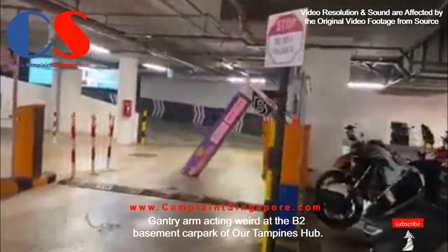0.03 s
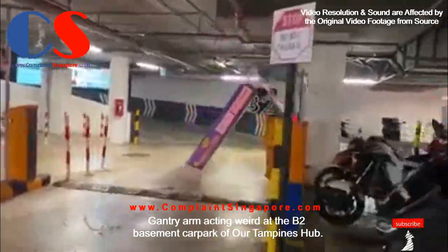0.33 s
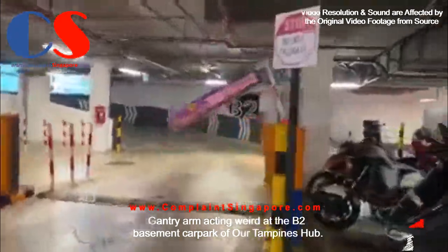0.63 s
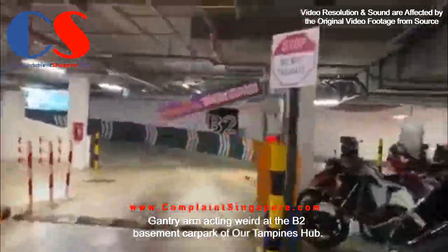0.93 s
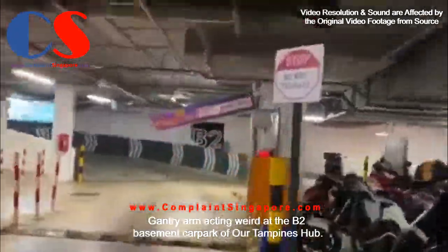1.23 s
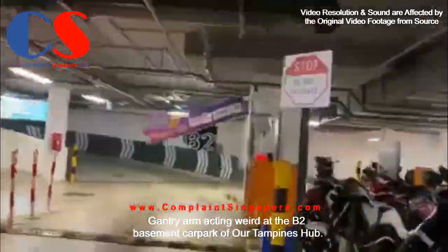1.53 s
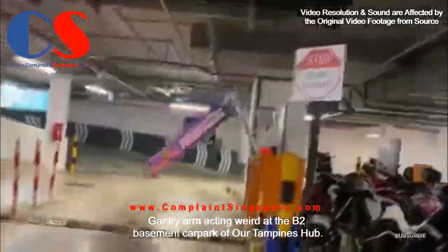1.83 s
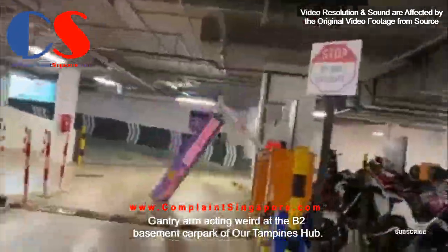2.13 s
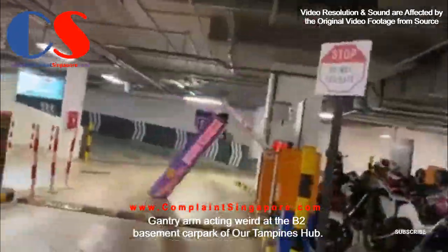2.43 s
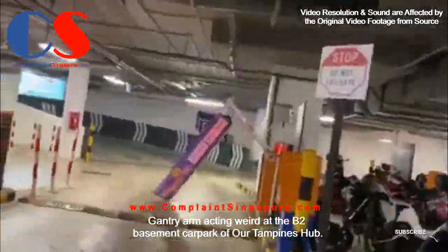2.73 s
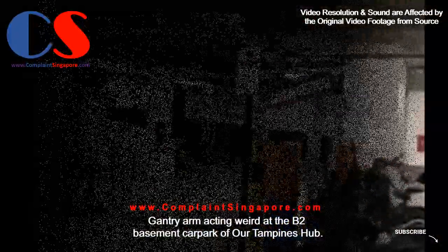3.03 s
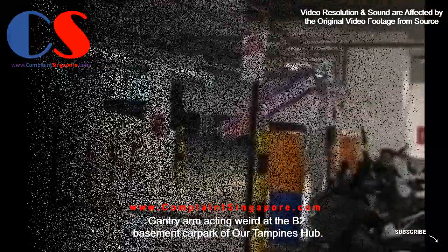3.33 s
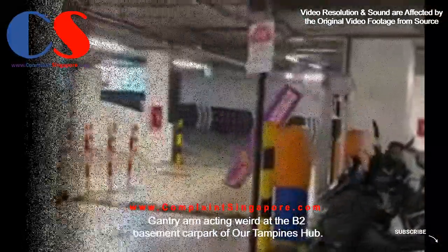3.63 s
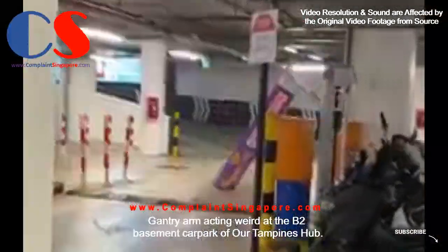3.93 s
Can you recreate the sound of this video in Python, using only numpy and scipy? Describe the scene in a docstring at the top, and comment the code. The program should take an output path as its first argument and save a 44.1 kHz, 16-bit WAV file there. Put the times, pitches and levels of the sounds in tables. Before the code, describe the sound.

A barrier arm bangs in a concrete basement car park over rumbling, humming ventilation and a faint motor whine. At first an earlier bang's echo fades, with faint clacks and two soft low bumps. The loose joint clacks at 1.9 seconds, then the arm bangs loudly at 2, ringing on. The sound cuts out briefly near 2.9. Another clack comes at 3.6 and a boomier echoing bang at 3.7.

```python
"""First you hear the fading echo of a bang in a concrete basement car park, over rumbling, humming vents.
A broken folding barrier arm swings with a faint motor whine. Its loose joint clacks, then the arm
bangs against its stop and the hall rings for seconds; a limiter turns everything down at each bang.
The sound drops out briefly near three seconds, then the arm clacks and bangs once more."""
import sys
import numpy as np
from scipy import signal
from scipy.io import wavfile
from scipy.ndimage import uniform_filter1d, minimum_filter1d

SR = 44100
rng = np.random.default_rng(int(sys.argv[2]) if len(sys.argv) > 2 else 0)


def waveform_to_disk(signal):
    """Save audio, clipped to [-1, 1], as 16-bit WAV at the path in sys.argv[1]."""
    frames = np.transpose(np.atleast_2d(signal))
    scaled = np.clip(frames, -1, 1) * 32767
    samples = np.round(scaled).astype(np.int16)
    wavfile.write(sys.argv[1], SR, samples)


N = 176400
GAP_START_S, GAP_END_S = 2.861, 3.048   # the short silence


# the arm hits its stop; the first hit is before the start, so only its echo is heard:
# (time [s], level [dB], brightness [dB per octave], boom [dB], clatter [dB], echo [dB])
BANGS = [(-.42, 4, -0.3, -12.5, -19, 1), (2.039, 3.5, -1, -14, -14.5, 1),
         (3.7307, -.5, 0.7, -2.5, -14, 5.5)]
# the loose joint catches; the row at 2.032 s is the arm scraping its stop just before it bangs: # (time [s],
# level [dB], brightness [dB per octave], ringing [dB], echo [dB], rise time [s])
CLACKS = [(0.356, -44.5, 2, -8, 7, 0.0055), (1.031, -39.5, -1.5, -12, 2, 0.0073),
          (1.8945, -22, 1, 1, 4, 0.0021), (1.909, -26, 1, 7, 4, .002), (2.032, -18.5, -3.5, -10, 3, 0.0016),
          (3.594, -31, 1.5, 18, -1, 0.011), (3.621, -30.5, -1, 0, 7, .008)]
def barrier():
    """Each bang and clack leaves in two directions, and each direction gets its own echo."""
    echoes, out = (hall(), hall()), np.zeros((2, N))
    crossfeed = 0.3   # share of each direction that reaches the other side
    hits = [(s, from_db(db) * bang(tilt, boom, rattle), echo_db)
            for s, db, tilt, boom, rattle, echo_db in BANGS]
    hits += [(s, from_db(db) * clack(tilt, ring, attack_s), echo_db)
             for s, db, tilt, ring, echo_db, attack_s in CLACKS]
    for s, direct, echo_db in hits:
        reflected = sum(signal.oaconvolve(way[None], echo, axes=1) for way, echo in zip(direct, echoes))
        sound = from_db(echo_db) * reflected / np.sqrt(2)
        sound[:, :direct.shape[1]] += (direct + crossfeed * direct[::-1]) / np.hypot(1, crossfeed)
        start = int(s * SR)
        end = int(GAP_END_S * SR) if s < GAP_START_S else N   # nothing rings on past the silence
        out[:, max(start, 0):end] += sound[:, max(-start, 0):end - start]
    return out


# the crack of the arm on its stop: (pitch [Hz], level [dB])
BANG_COLOUR = [(60, -27.5), (200, -1), (450, 2.5), (650, 3), (1000, 7.5), (1800, -1), (3300, -6),
               (5000, -12.5), (7200, -12), (8300, -24), (11000, -24.5), (15000, -34)]
# notes the arm rings at: (pitch [Hz], level [dB], fade time [s])
ARM_NOTES = [(680, -10, 0.04), (990, -21.5, 0.32), (1044, -10, 0.036), (1166, -12, 0.025),
             (1515, -21.5, 0.051), (2160, -30.5, 0.04), (2512, -33, 0.4), (2600, -25, 0.11),
             (2940, -33, .12), (3740, -31, 0.025), (3930, -39.5, 0.18), (4620, -32.5, .12)]
# the thud of the hollow housing: (pitch [Hz], level [dB])
HOUSING_COLOUR = [(60, -15), (250, -11), (550, -12.5), (1200, -7), (4000, -30)]
# notes the housing rings at: (pitch [Hz], level [dB], fade time [s])
HOUSING_NOTES = [(265, -1, 0.092), (416, -1, 0.026)]
def bang(tilt_db, boom_db, clatter_db):
    """The arm strikes its stop, bounces once, shakes the hollow housing and clatters."""
    strike = blow(BANG_COLOUR, ARM_NOTES, fade_s=0.071, tilt_db=tilt_db)
    count = strike.shape[1]
    # the bounce is a little duller, later and quieter
    bounce = blow(BANG_COLOUR, ARM_NOTES, fade_s=0.071, tilt_db=tilt_db - 1.5)
    bounce = from_db(-5) * np.pad(bounce, [(0, 0), (int(.008 * SR), 0)])[:, :count]
    boom = blow(HOUSING_COLOUR, HOUSING_NOTES, fade_s=0.043)
    return strike + bounce + from_db(boom_db) * boom + from_db(clatter_db) * clatter(count)


# the bright noise of the clatter: (pitch [Hz], level [dB])
CLATTER_COLOUR = [(300, -7.5), (700, 4), (1100, 3), (2700, 5), (3700, -2), (5200, 0), (7300, -1.5),
                  (8500, -9.5), (12000, -16.5), (15000, -20.5)]
def clatter(count, touches_per_s=320):
    """Many tiny knocks at uneven moments, dying away."""
    t = np.arange(count) / SR
    touches = (rng.random(count) < touches_per_s / SR) * rng.uniform(.5, 1, count)
    ticks = rms_one(signal.fftconvolve(touches, dying(t, fade_s=0.03))[:count])
    bands = noise_bands(count, likeness=[(1, 0.0034)])
    noise = rms_one(sum(band * from_db(at_hz(CLATTER_COLOUR, hz)) for hz, band in bands))
    return noise * ticks * dying(t, fade_s=0.33)


# the crack of the joint: (pitch [Hz], level [dB])
CLACK_COLOUR = [(200, -16.5), (700, 16), (1400, 13), (3000, 8), (6500, 4.5), (8500, -3), (15000, -15)]
# notes the joint rings at: (pitch [Hz], level [dB], fade time [s])
JOINT_NOTES = [(1005, -14, .07), (1422, -1.5, 0.055), (1533, -14, .05), (2870, -17.5, 0.075),
               (4035, -19.5, .05), (5080, -17.5, .04), (5800, -6, 0.014)]
def clack(tilt_db, ring_db, attack_s):
    """The joint takes up its slack and its parts knock together."""
    return blow(CLACK_COLOUR, JOINT_NOTES, fade_s=0.29, tilt_db=tilt_db,
                ring_db=ring_db, attack_s=attack_s)


def blow(colour, notes, fade_s, tilt_db=0, ring_db=0, attack_s=0.0041):
    """One knock: a noisy crack plus the part's own notes. fade_s and attack_s hold at 1 kHz."""
    t = np.arange(SR // 4) / SR
    crack, power = 0, 0
    for hz, noise in noise_bands(len(t), likeness=[(1, 0.0095)]):
        khz = hz / 1000
        band = noise * from_db(at_hz(colour, hz) + tilt_db * np.log2(khz))
        power += np.mean(band ** 2)
        crack += band * swell(t, hz, attack_s) * dying(t, fade_s / khz ** 0.16)   # highs die sooner
    ringing = 0
    for hz, db, ring_s in notes:
        note = from_db(db) * rng.choice([-1, 1]) * np.sin(2 * np.pi * hz * t)
        ringing += note * swell(t, hz, attack_s) * dying(t, ring_s)
    return crack / np.sqrt(power) + from_db(ring_db) * ringing


def swell(t, hz, attack_s):
    """How a vibration starts: low notes bend through the part slowly, so they arrive later."""
    khz = max(hz, 700) / 1000
    return 1 - np.exp(-(t * khz ** 0.16 / attack_s) ** 2)


# how long the hall rings: (pitch [Hz], fade time [s])
HALL_FADE = [(100, 5.3), (400, 3.2), (1000, 3.4), (2500, 3.08), (5500, 2.5), (7200, 1.4), (9000, 1.4),
             (15000, 1.2)]
# the tone of its echo: (pitch [Hz], level [dB])
HALL_COLOUR = [(100, 0.5), (155, 2.5), (250, -5), (400, 0.5), (650, 0), (1000, 0), (2500, 2.5),
               (4000, -0.5), (6000, 0), (12000, -3.5)]
# how alike the echo is left and right: (pitch [Hz], likeness [0 to 1])
HALL_LIKENESS = [(100, 1), (260, 1), (600, 0.26), (3000, 0.24), (12000, 0.58)]
def hall():
    """Quick echoes off the low ceiling and pillars, and a long, dulling tail from the far walls."""
    t = np.arange(N) / SR
    early = from_db(-41.5) * dying(t, fade_s=0.6)
    echo = 0
    for hz, noise in noise_bands(N, HALL_LIKENESS, size=20):
        tail = from_db(-43) * dying(t, at_hz(HALL_FADE, hz))
        echo += noise * from_db(at_hz(HALL_COLOUR, hz)) * (early + tail)
    return echo * (1 - np.exp(-t / 0.015))   # builds up over about 15 ms


# air rushing in the ducts: (pitch [Hz], level [dB])
VENT_COLOUR = [(22, -20.5), (36, -27.5), (58, 0), (90, -3), (140, -2), (230, -12), (350, -12.5),
               (520, -19.5), (1000, -23.5), (2000, -32), (4000, -39), (5800, -44), (8500, -60.5),
               (15000, -66)]
# how alike the air is left and right: (pitch [Hz], likeness [0 to 1])
VENT_LIKENESS = [(40, 1), (130, 0.99), (260, 0.72), (500, 0.3), (1500, 0.083), (12000, 0.11)]
# the deepest rumble swells and sinks: (time [s], level change [dB])
DEEP_SWELL = [(0, -1.5), (2.0, 0), (2.35, -2.5), (2.55, 2.5), (2.8, 4), (3.05, 1), (4, 0)]
# the hum of the fans: (pitch [Hz], width [Hz], level before the silence [dB], level after it [dB])
FAN_TONES = [(63.3, 6.8, -31, -34), (146.9, 16, -31.5, -30.5), (175.6, 3.6, -46, -26.5),
             (354, 7.7, -43, -40)]
def ventilation(air_db=-22.5, flutter_db=2, deep_below_hz=95):
    """Air rumbles and flutters in the ducts while the fans hum unsteadily."""
    t = np.arange(N) / SR
    deep_db = np.interp(t, *np.transpose(DEEP_SWELL))
    air = 0
    for hz, noise in noise_bands(N, VENT_LIKENESS, size=20):
        change_db = flutter_db * drift(rate_hz=9.6) + deep_db * (hz < deep_below_hz)
        air += noise * from_db(at_hz(VENT_COLOUR, hz) + change_db)
    hum = sum(wavering_tone(hz, width_hz) * from_db(np.where(t < GAP_END_S, before_db, after_db))
              for hz, width_hz, before_db, after_db in FAN_TONES)
    return from_db(air_db) * rms_one(air) + hum


# soft bumps in the rumble: (time [s], pitch [Hz], peak level [dB])
BUMPS = [(.86, 129.2, -21), (1.263, 135.6, -16.5)]
def bumps(width_s=0.014):
    """A low tone swells and vanishes so fast that it sounds like a soft bump."""
    t = np.arange(N) / SR
    return sum(from_db(db) * np.exp(-((t - s) / width_s) ** 2)
               * np.sin(2 * np.pi * (hz * t + rng.random())) for s, hz, db in BUMPS)


# how loud the motor whines: (time [s], lower tone [dB], upper tone [dB])
WHINE_LEVELS = [(0, -53, -54), (.9, -52.5, -54.5), (1.2, -50, -55), (1.31, -50, -50), (1.42, -58, -54.5),
                (1.52, -51, -57), (1.66, -49, -55), (1.85, -52.5, -59.5), (3.08, -49.5, -52),
                (3.22, -50, -54), (3.42, -45.5, -51.5), (3.55, -49, -52.5)]
# its two tones: (pitch [Hz], width [Hz])
WHINE_TONES = [(2540, 270), (5046, 350)]
def motor():
    """The motor whines faintly as it swings the arm, its two tones swelling unevenly."""
    t = np.arange(N) / SR
    times, *levels = np.transpose(WHINE_LEVELS)
    return sum(from_db(np.interp(t, times, db)) * wavering_tone(hz, width_hz)
               for db, (hz, width_hz) in zip(levels, WHINE_TONES))


def wavering_tone(hz, width_hz):
    """A tone that wobbles at random; the wider it is, the more it sounds like noise."""
    phase = 2 * np.pi * hz * np.arange(N) / SR
    return rms_one(drift(width_hz / 2) * np.cos(phase) + drift(width_hz / 2) * np.sin(phase))


def drift(rate_hz):
    """A smooth random wander, typically 1 in size."""
    pole = np.exp(-2 * np.pi * rate_hz / SR)
    return rms_one(signal.lfilter([1], [1, -2 * pole, pole * pole], rng.standard_normal(N + SR))[SR:])


def noise_bands(count, likeness, size=40):
    """Stereo hiss cut into slices from low to high; gives each slice's pitch and sound."""
    edges = 17.5 * 2 ** np.linspace(0, 10, size + 1)   # ten octaves
    white = rng.standard_normal((2, 2, count + SR // 10))
    for k, (low, high) in enumerate(zip(edges, edges[1:])):
        bandpass = signal.butter(2, [low, high], "band", fs=SR, output="sos")
        mid, side = signal.sosfilt(bandpass, white[k % 2])[:, -count:]
        hz = np.sqrt(low * high)
        alike = at_hz(likeness, hz)
        yield hz, np.sqrt((1 + alike) / 2) * mid + np.sqrt((1 - alike) / 2) * side * [[1], [-1]]


def dying(t, fade_s):
    """A fade that falls 60 dB in one fade time."""
    return np.exp(-np.log(1000) * t / fade_s)


def at_hz(table, hz):
    """Look up a table's value at any pitch."""
    pitches, values = np.transpose(table)
    return np.interp(np.log(hz), np.log(pitches), values)


def from_db(db):
    """Turn decibels into a multiplier."""
    return 10 ** (np.asarray(db) / 20)


def rms_one(x):
    """Scale a sound to an average power of 1."""
    return x / np.sqrt(np.mean(x ** 2) + 1e-20)


def scene():
    """The barrier and the steady sounds of the car park together."""
    return barrier() + ventilation() + motor() + bumps()


def limiter(x, limit_db=-9.5, window_s=0.0091, attack_s=0.00078, hold_s=0.25, release_db_per_s=26.5):
    """The volume drops at once on a loud sound, stays down, then creeps back."""
    power = uniform_filter1d(np.mean(x ** 2, axis=0), int(window_s * SR))
    level_db = 10 * np.log10(np.abs(power) + 1e-12)
    needed_db = np.minimum(limit_db - level_db, 0)
    half_hold = int(hold_s * SR / 2)
    held_db = -minimum_filter1d(needed_db, 2 * half_hold + 1, origin=half_hold, mode="nearest")
    recovery_db = release_db_per_s * np.arange(N) / SR
    cut_db = np.maximum.accumulate(held_db + recovery_db) - recovery_db
    pole = np.exp(-1 / (attack_s * SR))
    return x * from_db(-signal.lfilter([1 - pole], [1, -pole], cut_db))


def record(dry, cutoff_hz=15900):
    """Turn down the bangs, round off their peaks, mute the short gap and cut the highest treble."""
    t = np.arange(N) / SR
    sound_on = uniform_filter1d(1. * ((t < GAP_START_S) | (t > GAP_END_S)), size=128)
    limited = limiter(dry)
    rounded = limited / (1 + limited ** 6) ** (1 / 6)
    lowpass = signal.ellip(10, .1, 80, cutoff_hz, fs=SR, output="sos")
    return signal.sosfilt(lowpass, rounded * sound_on)


dry = scene()
out = record(dry)
waveform_to_disk(out)
```